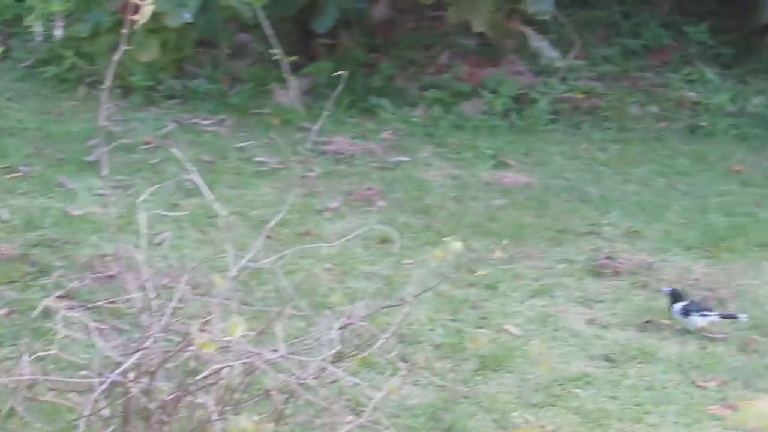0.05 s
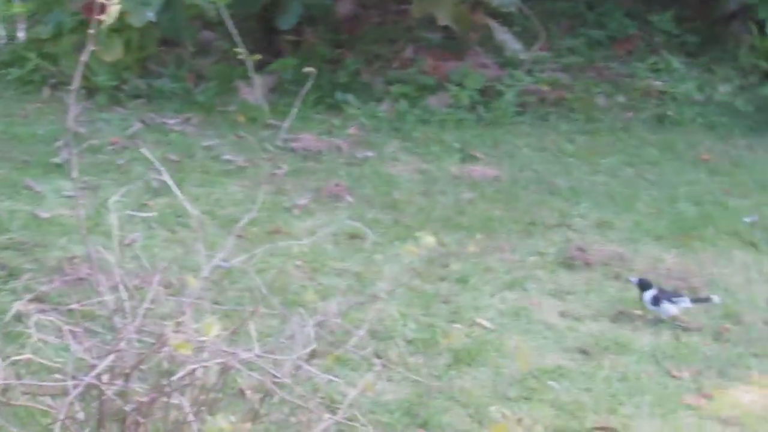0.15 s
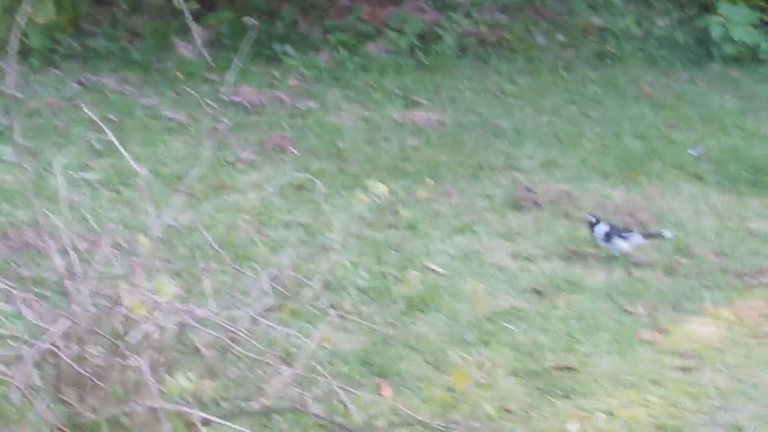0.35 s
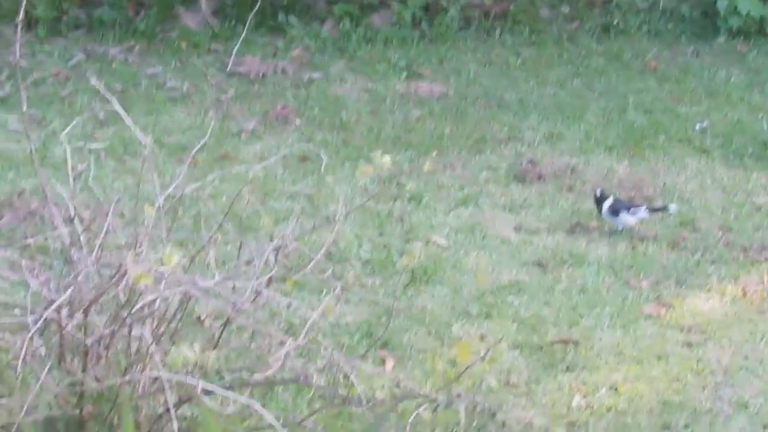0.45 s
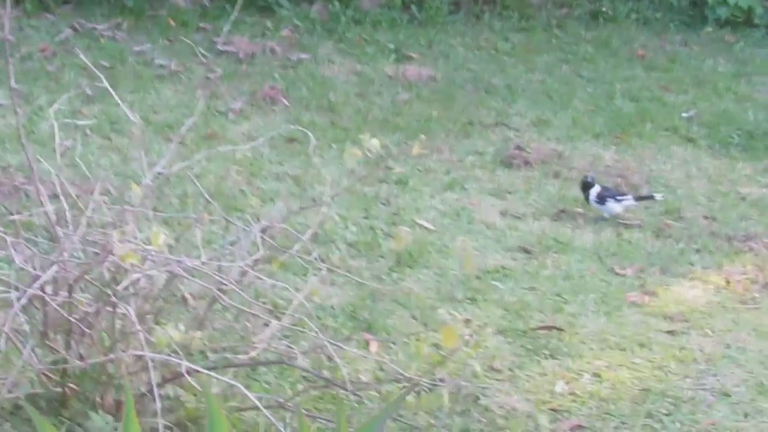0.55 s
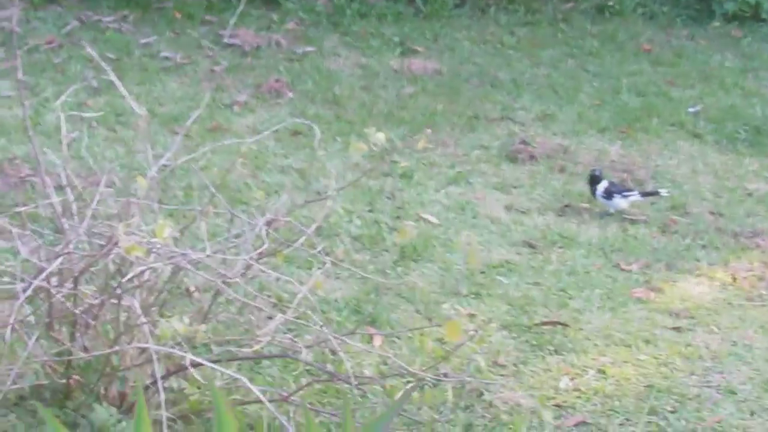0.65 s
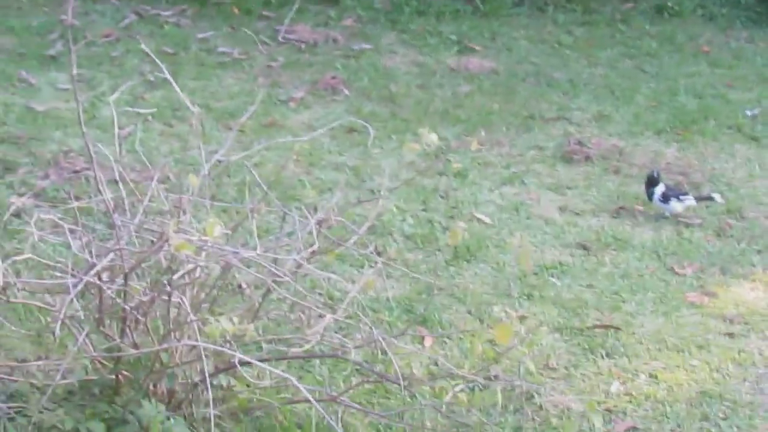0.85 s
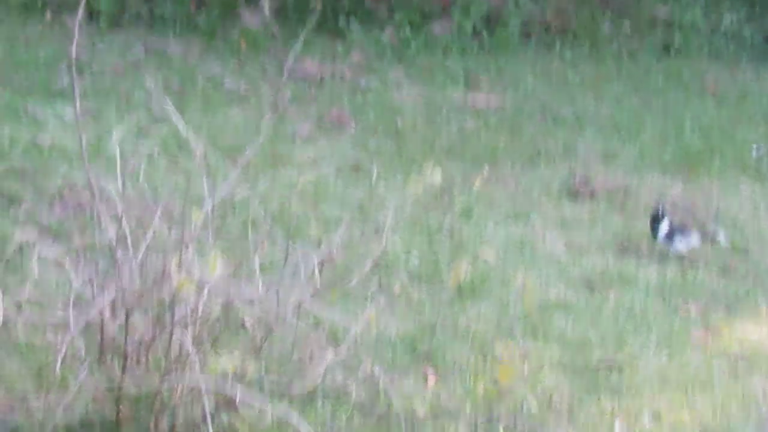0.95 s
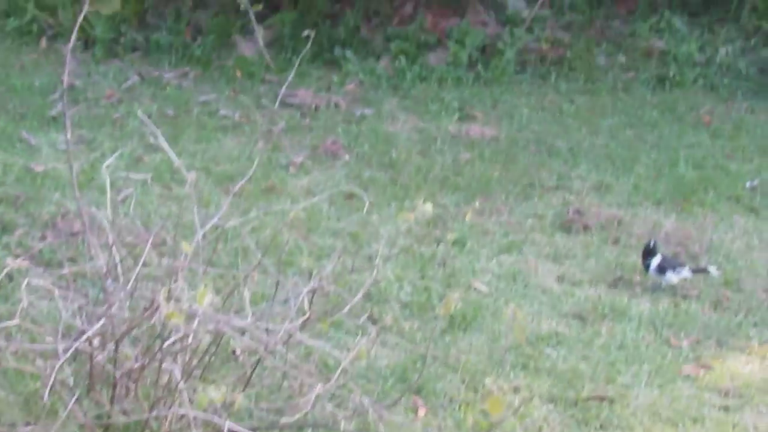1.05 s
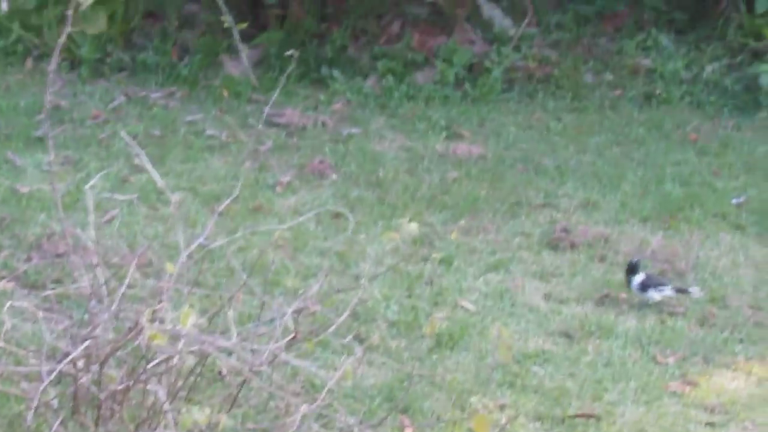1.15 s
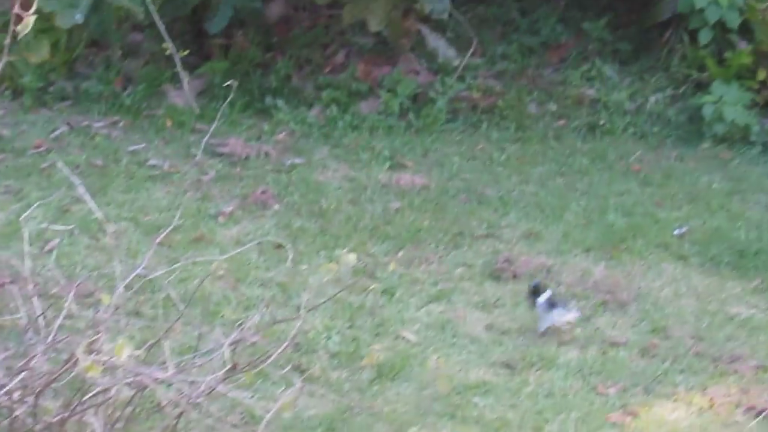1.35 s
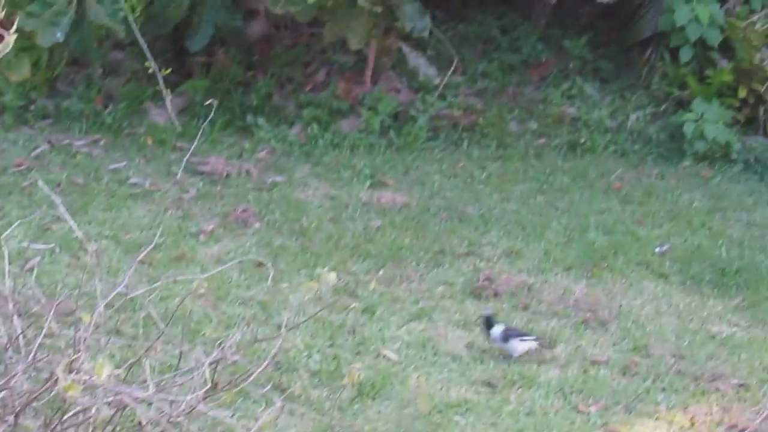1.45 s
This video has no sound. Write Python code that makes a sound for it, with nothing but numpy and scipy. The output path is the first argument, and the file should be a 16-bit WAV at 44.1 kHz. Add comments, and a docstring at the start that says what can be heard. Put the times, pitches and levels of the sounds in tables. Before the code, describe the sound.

A bird gives a harsh rising rasp that snaps into one short, clear whistle outdoors.

```python
"""Over a low hum and outdoor hiss, a butcherbird on a lawn starts a harsh, fluttering rasp.
The two sides of its syrinx buzz at separate pitches; the call swells and climbs, and its hiss
brightens as the opening beak shifts the throat's resonances. At 0.8 s the rasp snaps into one clear
whistle. Trees scatter back a soft echo, and from 1 s small birds chirp farther off."""
import sys
import numpy as np
from scipy import signal
from scipy.fft import rfft, irfft, next_fast_len
from scipy.io import wavfile
from scipy.ndimage import map_coordinates

SR = 44100
rng = np.random.default_rng(int(sys.argv[2]) if len(sys.argv) > 2 else 0)


def wrap_up_sound(samples):
    """Save the sound to the file named by the first command line argument, as 16-bit audio."""
    columns = np.atleast_2d(samples).T
    # keep every value between -1 and 1, then stretch to whole-number steps
    tamed = np.clip(columns, -1, 1)
    steps = np.round(tamed * 32767).astype(np.int16)
    wavfile.write(sys.argv[1], SR, steps)


N = 66150

# The flutter of the rasp. Each row: time in seconds, rate in beats per second.
FLUTTER_RATE = [(.15, 96.4), (.35, 95), (.47, 128), (.68, 131), (.79, 138)]

def rasp():
    """Common modulation: one flutter drives tones and hiss, so they fuse into a single call."""
    rate, = curves(FLUTTER_RATE)
    flutter = phase_of(rate * (1 + .075 * wobble(119.86)))
    return syrinx(flutter) + throat_overtones(flutter) + throat_hiss(flutter)


# The syrinx's two sides and a weak side tone. Each row: time in seconds, pitch in Hz, level in dB.
LOW_SIDE = [(.135, 610.7, -52), (.16, 618, -44), (.3, 683.8, -43.5), (.46, 749.9, -42.5), (.51, 679.5, -52),
            (.58, 776, -45), (.615, 880.7, -46.5), (.65, 930.4, -33.5), (.7, 1019, -38), (.73, 1044, -33),
            (.785, 1197, -36), (.797, 1548, -29), (.804, 2414, -28), (.812, 2760, -24)]
HIGH_SIDE = [(0.134, 1230, -49), (0.159, 1186, -35), (0.272, 1238, -37), (0.378, 1253, -40),
             (0.481, 1234, -35.5), (.52, 1360, -40.5), (0.577, 1485, -34), (.61, 1480, -36.5),
             (.66, 1585, -31.5), (.72, 1820, -40), (0.788, 2470, -41), (.81, 2660, -60)]
WEAK_TONE = [(.15, 1720, -53), (0.251, 1650, -59), (0.302, 1660, -48.5), (0.419, 1770, -42),
             (.51, 1766, -48)]

def syrinx(flutter):
    """Biphonation: each side of the syrinx vibrates at its own pitch, with a faint third tone."""
    return sum(buzz(rows, flutter, jitter=.0188, swing_hz=96)
               for rows in (LOW_SIDE, HIGH_SIDE, WEAK_TONE))


# Three shrill overtones, a table each. Each row: time in seconds, pitch in Hz, level in dB.
SHRILL_TONES = [
    [(.15, 4700, -44), (.27, 4950, -37.5), (.36, 4950, -45), (.42, 5200, -35), (.46, 4950, -37.5),
     (.55, 4650, -36), (.59, 4650, -53)],
    [(.58, 3400, -45), (.65, 3820, -32), (.69, 4200, -28.5), (.725, 4430, -26.5), (.77, 4480, -32),
     (.79, 4900, -48)],
    [(.44, 6700, -40), (.55, 6600, -30), (.66, 6400, -34), (.73, 6600, -29), (.78, 7000, -30),
     (.803, 7100, -30), (.811, 8200, -44)],
]
# Their positions. Each entry: left over right in dB.
SHRILL_PAN_DB = [10.5, 4.5, 5]

def throat_overtones(flutter):
    """Resonance: the throat singles out overtones, each sounded here as a separate gliding tone."""
    return sum(panned(pan_db) * buzz(rows, flutter, jitter=.01216, swing_hz=83)
               for rows, pan_db in zip(SHRILL_TONES, SHRILL_PAN_DB))


def buzz(rows, flutter, jitter, swing_hz):
    """Amplitude and frequency modulation: the flutter chops and bends a tone, adding sidebands."""
    hz, db = curves(rows)
    drift = 1 + jitter * wobble(300) + .012 * wobble(45)
    phase = phase_of(hz * drift + swing_hz * np.sin(flutter))
    tone = np.sin(phase) + amp(-16.5) * np.sin(2 * phase)
    chop = (1 + .44 * np.cos(flutter)) * amp(1.8 * wobble(80))
    return unit(tone * chop) * amp(db) * gate(rows[0][0], rows[-1][0])


# Strength of the hiss. Each row: time in seconds, relative level in dB.
HISS_LEVEL = [(.125, -70), (.145, -34), (.165, -32), (.26, -31.5), (.42, -32.5), (.445, -28), (.56, -23.5),
              (.66, -20.5), (.71, -20.5), (.745, -22), (.785, -21), (.805, -19)]
# Sputter of the hiss. Each row: time in seconds, scatter of the level in dB.
HISS_SPUTTER = [(.15, .9), (.58, 1.1), (.68, 2.6), (.8, 2.6)]
# The beak. Each row: time in seconds, opening (0 nearly shut, 1 half open, 2 wide, 3 strained).
BEAK_OPENING = [(.41, 0), (.45, 2.5), (.56, 0.5), (.62, 2.5), (.7, 1.5), (.74, 3)]
# Throat resonances at those four openings. Each row: frequency in Hz, relative gain in dB.
THROAT_SHUT = [(1200, -17.5), (2100, -22), (2500, -12), (2850, -12), (3500, -2), (4100, -4), (4900, 1),
               (5600, -3), (6300, -2), (7100, -10.5), (8100, -6), (9200, -12), (11000, -11.5),
               (12500, -17.5), (13500, -24), (15000, -34)]
THROAT_HALF = [(1240, -20.5), (2100, -27), (2580, -22), (2800, -23), (3040, -18), (3610, -12.5),
               (4060, -17), (4590, -7), (5730, -9), (6540, -5.5), (7960, -7), (10500, -14.5),
               (11700, -12.5), (14200, -23), (15000, -28)]
THROAT_WIDE = [(1240, -27), (2100, -13.5), (2600, -17.5), (2870, -11.5), (3190, -9.5), (3740, -3.5),
               (4060, -3), (4860, 0), (5360, -9.5), (6540, 0), (7580, -5.5), (10200, -11.5), (11400, -11),
               (13700, -20), (15000, -36)]
THROAT_STRAINED = [(1240, -34), (2100, -15), (2240, -14), (2580, -14), (3070, -14), (3250, -2.5), (3440, 1),
                   (4020, -6), (4510, -10.5), (5230, -7.5), (6120, -8), (6810, 3), (7900, -14.5),
                   (9460, -8), (10600, -15), (12100, -11), (15000, -31)]
# Balance of the hiss, beak shut and open. Each row: frequency in Hz, left over right in dB.
SHUT_PAN = [(60, 19), (92, 9.5), (140, 1), (210, 3), (330, -6), (500, 5), (770, -5), (1170, -4), (1790, 21),
            (2740, 4), (4190, 10.5), (6410, 8.5), (9810, 2), (15000, -2)]
OPEN_PAN = [(2000, -2), (3400, 1), (5000, 1), (6000, 8.5), (7000, 8), (8000, 10), (8700, -4.5), (10000, 2),
            (11300, -4.5), (15000, -2.5)]
# Likeness of the hiss in the two ears. Each row: frequency in Hz, coherence from 0 to 1.
HISS_COHERENCE = [(2000, 1), (4000, 0.87), (6800, 0.62), (8200, 0.1), (12000, 0.33)]

def throat_hiss(flutter, pulse_share=.23):
    """Source and filter: ragged syrinx pulses and turbulent air pass through the opening throat."""
    hz, _ = curves(LOW_SIDE)
    cycles = np.floor(phase_of(hz * (1 + .018 * wobble(900))) / (2 * np.pi))
    pulses = unit(np.diff(cycles, prepend=0) / np.sqrt(hz))  # one a cycle, at even power
    source = rng.standard_normal((2, N))
    source[0] = np.sqrt(pulse_share) * pulses + np.sqrt(1 - pulse_share) * source[0]
    db, = curves(HISS_LEVEL)
    scatter_db, = curves(HISS_SPUTTER)
    beak, = curves(BEAK_OPENING)
    bursts = unit((1 + .13 * np.cos(flutter)) * amp(scatter_db * wobble(420)))
    throats = [(THROAT_SHUT, SHUT_PAN), (THROAT_HALF, OPEN_PAN),
               (THROAT_WIDE, OPEN_PAN), (THROAT_STRAINED, OPEN_PAN)]
    out = np.zeros((2, N))
    for opening, (resonances, pan) in enumerate(throats):
        crossfade = np.clip(1 - abs(beak - opening), 0, 1)
        out += crossfade * spread(source * bursts, resonances, HISS_COHERENCE, pan)
    return out * amp(db - 1) * gate(HISS_LEVEL[0][0], end=.815, edge_s=.016)


# The closing note. Each row: time in seconds, pitch in Hz, relative level in dB.
WHISTLE_NOTE = [(.803, 2478, -26), (0.812, 2765, -17), (0.818, 2777, -19), (0.832, 2675, -9),
                (.84, 2614, -15), (.85, 2614, -15), (.861, 2614, -15), (0.873, 2614, -31),
                (0.884, 2450, -37)]
# Its harmonics, from the first up. Each row: gain in dB, left over right in dB, unsteadiness in dB.
WHISTLE_HARMONICS = [(-0.5, -3, 1.7), (-26, 7.5, 6), (-17.5, 10, 5), (-24.5, -4.5, -0.5), (-39, -1, -2)]

def whistle():
    """Periodic vibration: free of flutter, one harmonic note flicks up and then falls slightly."""
    hz, db = curves(WHISTLE_NOTE)
    phase = phase_of(hz)
    tone = sum(amp(gain_db + unsteady_db * wobble(200)) * panned(pan_db) * np.sin(k * phase)
               for k, (gain_db, pan_db, unsteady_db) in enumerate(WHISTLE_HARMONICS, start=1))
    return np.sqrt(2) * tone * amp(db) * gate(WHISTLE_NOTE[0][0], WHISTLE_NOTE[-1][0])


def near_reflections(x, t60_s=.12, delay_s=.003, low_cut_hz=2070, width=.33):
    """Early reflections: nearby surfaces give a short, dense answer, wider in the treble."""
    treble = filtered(x, lambda hz: hz ** 2 / (hz ** 2 + low_cut_hz ** 2))
    t = np.arange(SR // 10) / SR
    mid, side = rng.standard_normal((2, len(t))) * amp(-60 * t / t60_s) * (t > delay_s)
    tail = mid + width * np.diff(side, prepend=0) * np.array([[1], [-1]])
    return signal.fftconvolve(treble, tail / np.linalg.norm(tail[0]), axes=1)[:, :N]


# Colour of the whistle's echo. Each row: frequency in Hz, relative gain in dB.
WHISTLE_ECHO_COLOUR = [(2600, -3), (5300, 11), (8000, 2.5), (10600, 12), (13000, 3)]

def call_echo(harsh, clear):
    """Reflection: the trees return the call softly, the whistle with stronger upper harmonics."""
    bright = filtered(clear, lambda hz: amp(along(WHISTLE_ECHO_COLOUR, hz)))
    return tree_scatter(amp(-19.5) * harsh + amp(-15) * bright)


# Decay among the trees. Each row: frequency in Hz, time to fall 60 dB in seconds.
TREE_DECAY = [(300, 0.13), (2600, 0.85), (6000, 0.36), (12000, 0.15)]

def tree_scatter(x, delay_s=.012):
    """Diffuse scattering: trees leave a tail in which each frequency decays at its own rate."""
    hz, t, noise = signal.stft(rng.standard_normal((2, SR)), SR, nperseg=256)
    decay = amp(-60 * t / along(TREE_DECAY, hz)[:, None])
    _, tail = signal.istft(noise * decay, SR, nperseg=256)
    tail = np.pad(tail / np.linalg.norm(tail[0]), ((0, 0), (int(delay_s * SR), 0)))
    return signal.fftconvolve(x, tail, axes=1)[:, :N]


# Distant chirps. Each row: start in seconds, length in seconds, first pitch in Hz, last pitch in Hz,
# level in dB, octave over fundamental in dB.
BIRD_CHIRPS = [(1.017, 0.033, 3613, 3490, -38, -22), (1.034, 0.056, 3096, 3310, -41.5, -5),
               (1.121, 0.04, 2454, 2570, -46, -15), (1.154, 0.041, 3350, 3440, -46, -14),
               (1.191, 0.045, 2945, 3157, -39.5, -12), (1.319, 0.028, 3050, 3490, -45, 1),
               (1.337, 0.04, 4315, 3755, -37.5, -15), (1.372, .014, 2950, 3250, -45, 5),
               (1.382, 0.063, 4130, 4233, -39.5, -18), (1.465, 0.037, 4210, 4600, -38, -30)]

def small_birds():
    """Direct-to-reverberant ratio: short, wavering glides sound far off under their strong echo."""
    out = np.zeros(N)
    for start, length, first_hz, last_hz, db, octave_db in BIRD_CHIRPS:
        hz, = curves([(start, first_hz), (start + length, last_hz)])
        phase = phase_of(hz * (1 + .01205 * wobble(200)))
        tone = np.sin(phase) + amp(octave_db) * np.sin(2 * phase)
        out += tone * amp(db + 1.7 * wobble(120)) * gate(start, start + length, edge_s=.009)
    direct = np.sqrt(2) * np.array([out, out])
    return direct + amp(-5) * tree_scatter(direct)


# Spectra of the rumble and the outdoor hiss. Each row: frequency in Hz, relative level in dB.
RUMBLE_SPECTRUM = [(12, -58), (20, -9), (80, -0.5), (113, -7.5), (146, -7), (233, -6.5), (260, -6),
                   (295, -6), (347, -9.5), (498, -10.5), (1500, -31), (1950, -23), (3300, -120)]
AIR_SPECTRUM = [(710, -10), (1200, -9), (2230, -11.5), (2590, -8), (2800, -10), (3250, -7.5), (3940, -7.5),
                (4340, -3.5), (5730, -5), (7090, -5), (8240, -2), (9780, -12), (12000, -14), (14700, -29.5),
                (15500, -42)]
# Strength of the outdoor hiss. Each row: time in seconds, level in dB.
AIR_LEVEL = [(0, -43), (.12, -42), (.9, -45), (1.5, -43)]
# Likeness of both noises in the two ears. Each row: frequency in Hz, coherence from 0 to 1.
FIELD_COHERENCE = [(60, 0.89), (300, 0.91), (640, 0.8), (1400, 0.69), (3100, 0.45), (7000, 0.11),
                   (15000, .05)]
# Balance of both noises. Each row: frequency in Hz, left over right in dB.
FIELD_PAN = [(60, 0), (99, -2), (160, -4.5), (270, -0.5), (450, -1), (740, -0.5), (1220, -1.5),
             (2010, -0.5), (3330, -1), (5500, 8.5), (9080, 4.5), (15000, -3)]
# Partials of the distant hum. Each row: frequency in Hz, level in dB.
HUM_PARTIALS = [(75.5, -59.5), (151, -52.5), (227, -54.5)]

def background():
    """A diffuse field, less coherent as frequency rises: rumble and wide hiss around a wavering hum."""
    rumble = spread(rng.standard_normal((2, N)), RUMBLE_SPECTRUM, FIELD_COHERENCE, FIELD_PAN)
    air = spread(rng.standard_normal((2, N)), AIR_SPECTRUM, FIELD_COHERENCE, FIELD_PAN)
    air_db, = curves(AIR_LEVEL)
    hum = np.zeros(N)
    for hz, db in HUM_PARTIALS:
        swell = amp(db + 2 * wobble(6.16))
        hum += swell * np.sin(phase_of(hz * (1 + .014 * wobble(15))))
    return amp(-45) * rumble + amp(air_db) * air + np.sqrt(2) * hum


def amp(db):
    """The decibel scale: 20 dB is a tenfold amplitude."""
    return 10 ** (np.asarray(db) / 20)


def unit(x):
    """Normalisation to an rms of 1."""
    return x / np.sqrt(np.mean(x ** 2) + 1e-20)


def along(points, hz):
    """Interpolation of (Hz, value) points on a logarithmic frequency axis."""
    knots_hz, values = np.transpose(points)
    return np.interp(np.log(hz + 1), np.log(knots_hz + 1), values)


def curves(rows):
    """Linear interpolation: one value per sample for each column after the time."""
    times, *columns = np.transpose(rows)
    return [np.interp(np.arange(N) / SR, times, column) for column in columns]


def gate(start, end, edge_s=.0025):
    """A trapezoidal window between two times in seconds."""
    t = np.arange(N) / SR
    return np.clip(np.minimum(t - start, end - t) / edge_s, 0, 1)


def wobble(rate):
    """Smooth random modulation: a spline through `rate` knots a second."""
    knots = rng.standard_normal(int(N * rate / SR) + 4)
    return map_coordinates(knots, [np.arange(N) * rate / SR])


def phase_of(hz):
    """Phase as the integral of frequency."""
    return 2 * np.pi * np.cumsum(hz) / SR


def filtered(x, response):
    """Linear filtering: the spectrum of x times a frequency response."""
    size = next_fast_len(N + SR // 2)
    hz = np.fft.rfftfreq(size, 1 / SR)
    return irfft(rfft(x, size) * response(hz), size)[..., :N]


def panned(db):
    """Interaural level difference: gains that set left `db` above right."""
    return amp(np.array([[.5], [-.5]]) * db)


def spread(pair, spectrum, coherence, pan):
    """Mid-side mixing: two unrelated signals become coloured stereo whose middle has rms 1."""
    def mid_side_gains(hz):
        angle = np.arccos(np.clip(along(coherence, hz), -1, 1)) / 2
        return amp(along(spectrum, hz)) * [np.cos(angle), np.sin(angle)]

    mid, side = filtered(pair, mid_side_gains)
    out = filtered(np.array([mid + side, mid - side]), lambda hz: panned(along(pan, hz)))
    return out / np.sqrt(np.mean(out.mean(0) ** 2))


def scene():
    """Superposition: the call, its echoes and the garden add at the listener."""
    harsh, clear = rasp(), whistle()
    echoes = amp(-4.5) * near_reflections(harsh) + call_echo(harsh, clear)
    return harsh + clear + echoes + small_birds() + background()


def record(dry):
    """Band limiting: nothing above 15.3 kHz passes."""
    return filtered(dry, lambda hz: hz < 15300)


dry = scene()
out = record(dry)
wrap_up_sound(out)
```